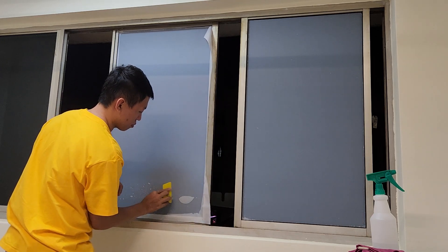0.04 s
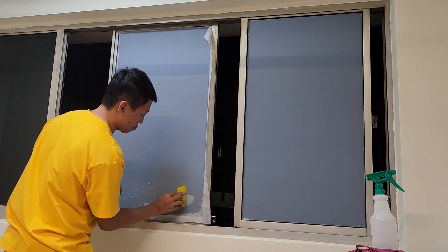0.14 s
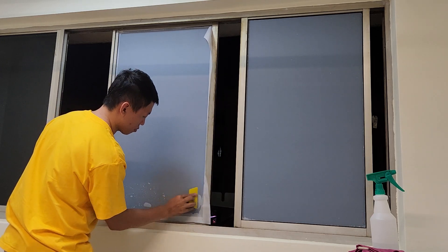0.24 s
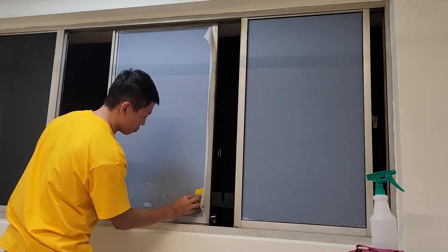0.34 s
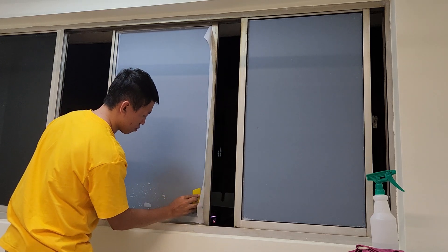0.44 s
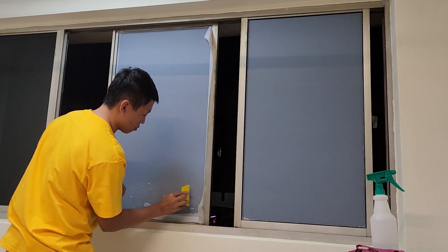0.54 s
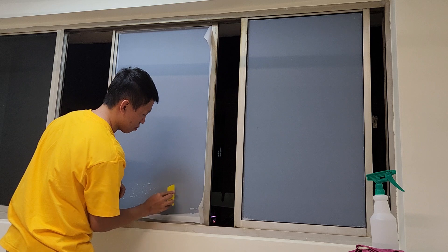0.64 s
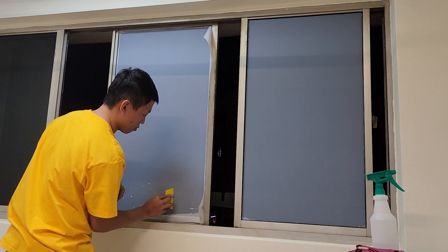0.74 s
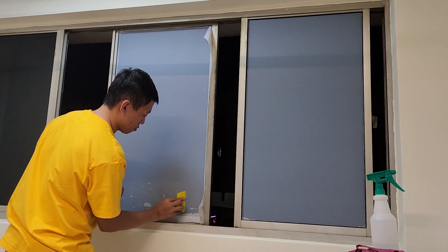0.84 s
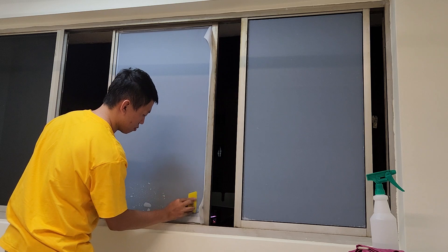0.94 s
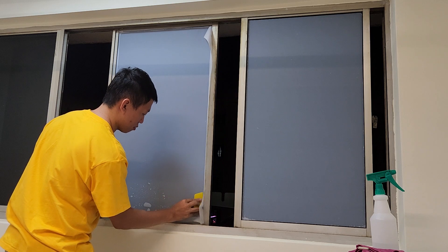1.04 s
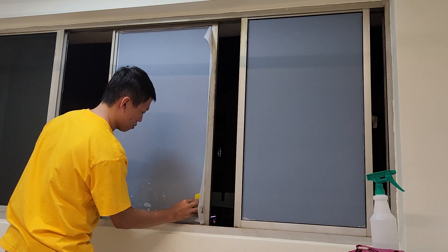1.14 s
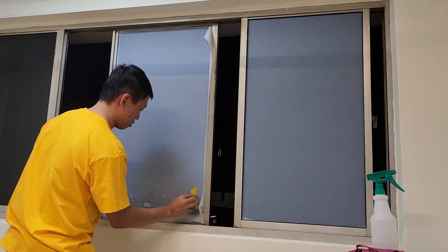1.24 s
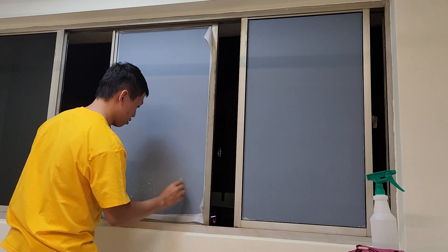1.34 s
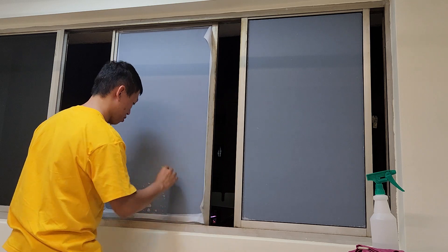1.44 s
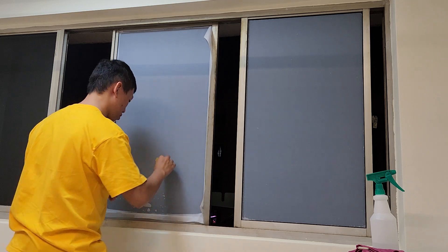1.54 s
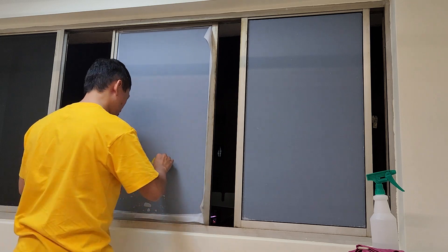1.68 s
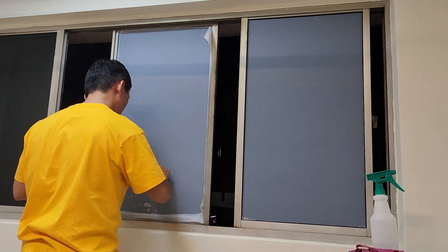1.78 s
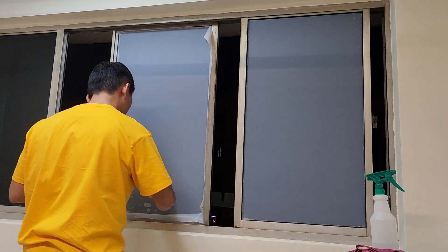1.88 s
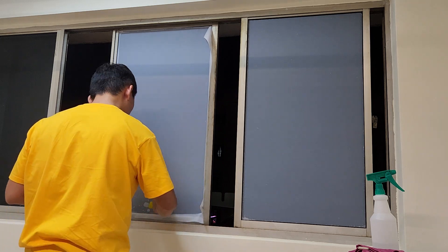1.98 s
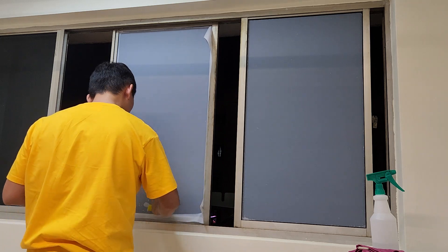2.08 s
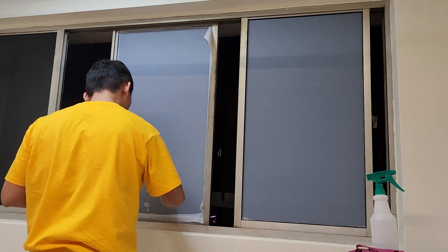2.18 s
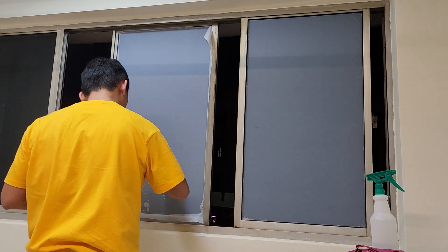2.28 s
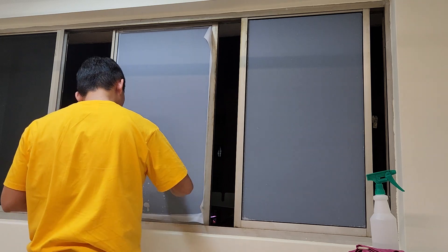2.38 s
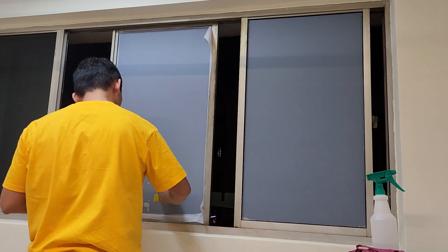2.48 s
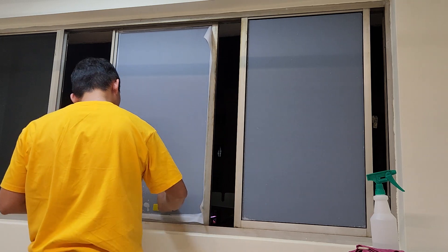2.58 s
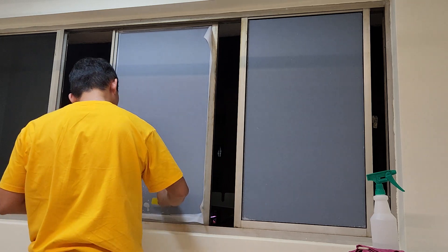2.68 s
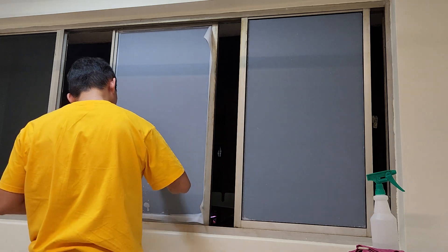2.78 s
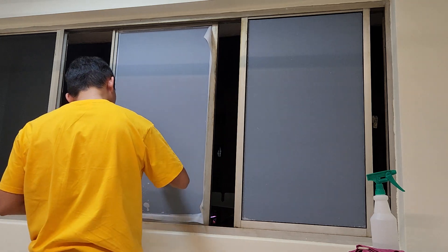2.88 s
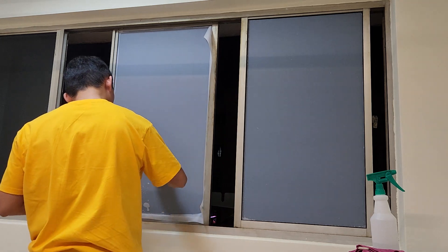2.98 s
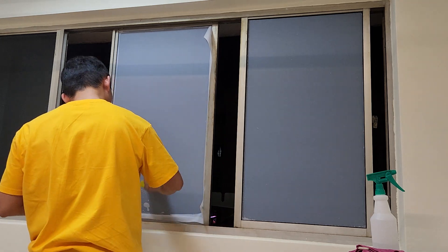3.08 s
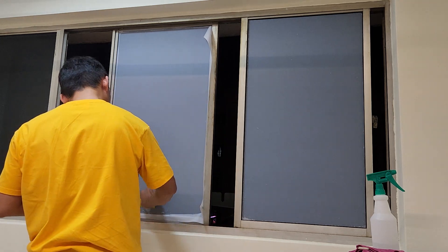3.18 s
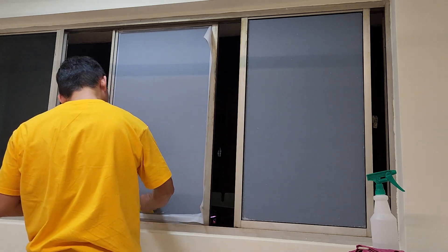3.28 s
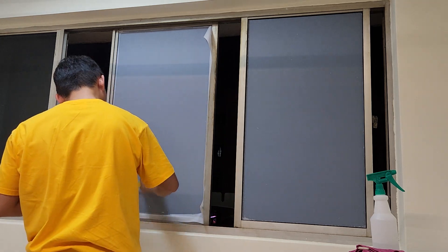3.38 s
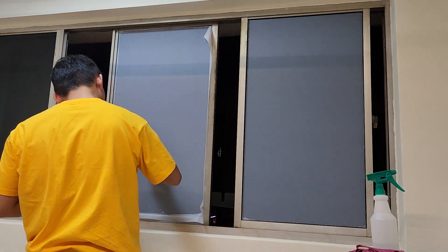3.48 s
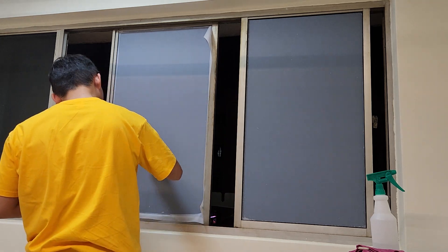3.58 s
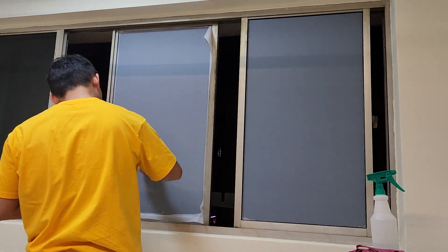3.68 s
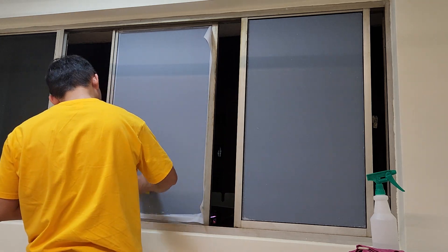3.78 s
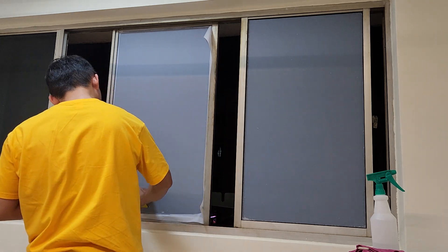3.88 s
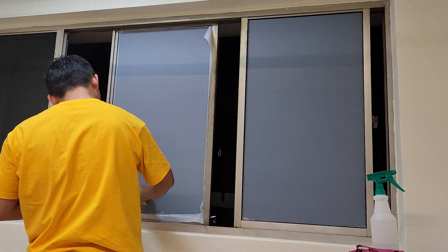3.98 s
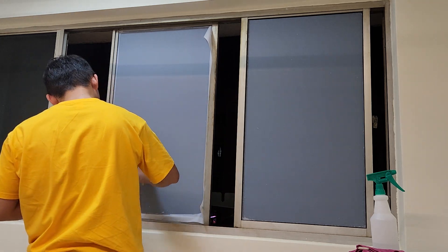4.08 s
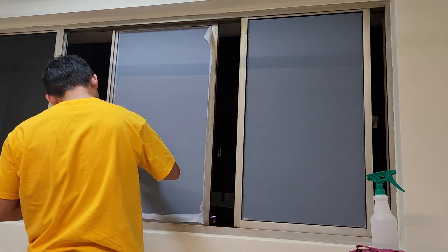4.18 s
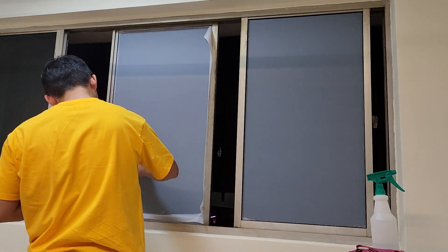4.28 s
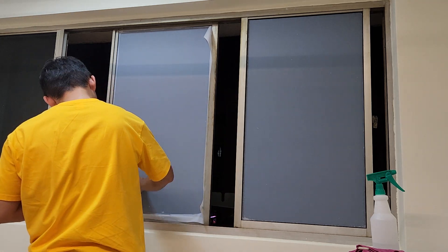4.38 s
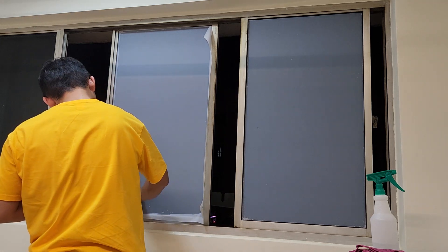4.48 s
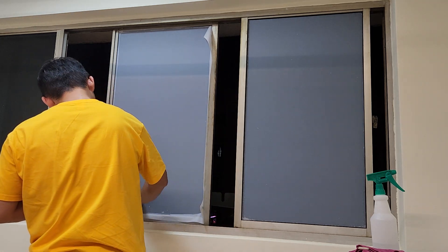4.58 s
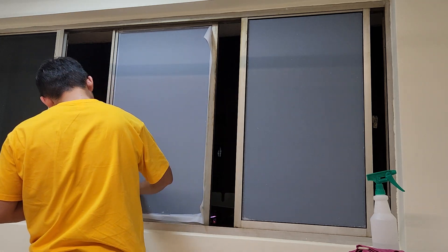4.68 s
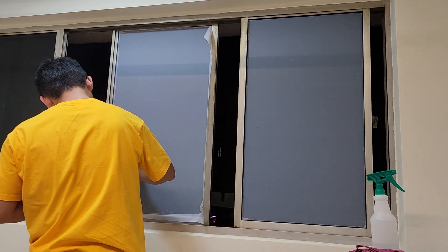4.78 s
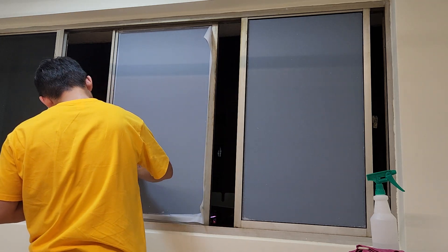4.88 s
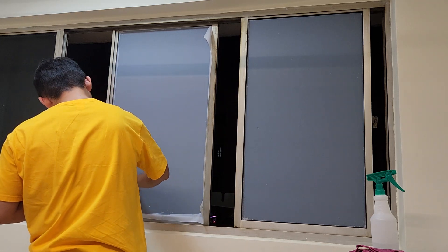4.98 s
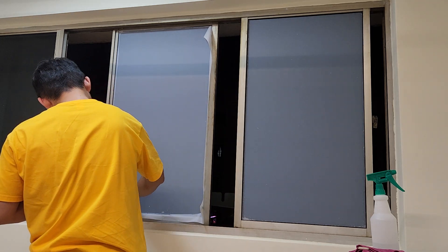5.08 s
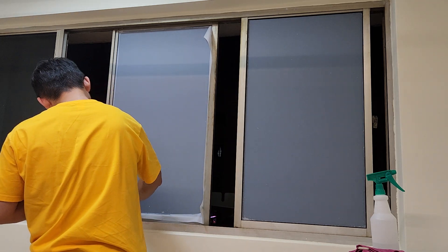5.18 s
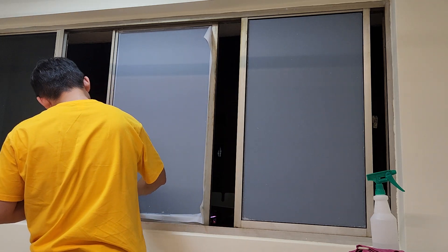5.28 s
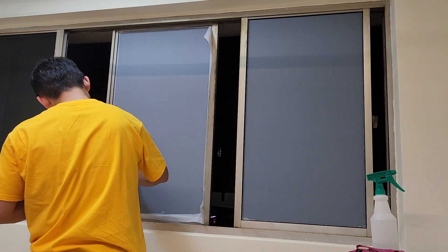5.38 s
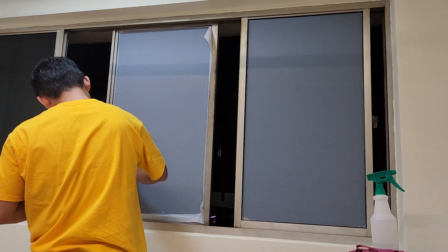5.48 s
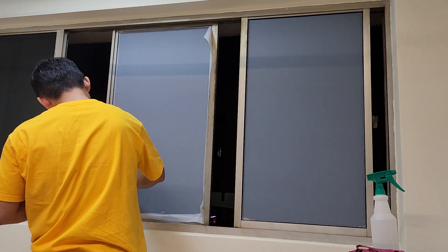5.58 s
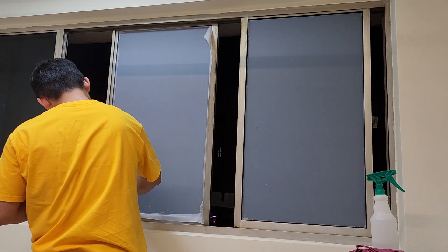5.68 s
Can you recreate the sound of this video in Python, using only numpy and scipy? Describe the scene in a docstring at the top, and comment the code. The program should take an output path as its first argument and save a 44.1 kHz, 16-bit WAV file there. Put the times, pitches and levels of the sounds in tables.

```python
"""Plate swept over wet film on a window

In a bare, quiet room, just left of a phone's stereo pair, a plastic plate rubs wet film on a pane.
Noise and random slips make gritty hiss that swells and fades, first sideways, then downward.
Noise bursts and a decaying sine make ticks and knocks on the glass at some landings.
Gliding sines and noise make the pushed sash creak, with low thuds from the pane.
Random echo tails ring after the work, over a low drone, two wavering hum lines and faint air."""
import sys
import numpy as np
from scipy import signal
from scipy.fft import rfft, irfft, next_fast_len
from scipy.io import wavfile
from scipy.ndimage import map_coordinates

SR = 44100
rng = np.random.default_rng(int(sys.argv[2]) if len(sys.argv) > 2 else 0)


def dump(signal):
    """Clip the signal to [-1, 1] and save it as 16-bit WAV at the path in sys.argv[1]."""
    limited = np.clip(np.atleast_2d(signal).T, -1, 1)
    pcm = np.round(limited * 32767).astype(np.int16)
    wavfile.write(sys.argv[1], SR, pcm)


N = 252693

# Levels of sources are set before the room's gains; spectra give shape only.
# The room's low drone: pitch_hz, density_db (per Hz)
DRONE_SPECTRUM = [(12, -10), (24, -3.5), (31, -11), (41, 1), (52, -2), (65, 0), (100, -1.5), (125, -2),
                  (165, -6), (200, -10.5), (260, -14.5), (360, -12.5), (470, -28.5), (900, -79)]
# Faint air noise: pitch_hz, density_db (per Hz)
AIR_SPECTRUM = [(200, 0.5), (400, 4.5), (700, 6), (1200, -4), (2000, -2), (4000, -13.5), (8000, -24.5),
                (10200, -19.5), (11300, -47), (15500, -44)]
# Hum lines: pitch_hz, level_db (about which each wavers)
HUM_LINES = [(84, -58), (151, -60.5)]
# Echo decay, before the early boost: pitch_hz, t60_s
ROOM_DECAY = [(100, 0.17), (600, 1), (2000, 0.84), (5000, 0.73), (8000, 0.66), (13000, 0.51)]
# Passes of the plate, pressed hard or just grazing on the way back: start_s, sideways (1, downward 0),
# speed_up_s, slow_down_s, top_speed_level_db, touch_down_level_db, first_bite_db, body_db, ring_hz,
# fizz_db, treble_at_first_touch_db
PASSES = [(0, 1, .01, .07, -64, -61, -62, -2, 2700, -3, 0),
          (.092, 1, 0.22, 0.15, -30.5, -62.5, -39, -.5, 2820, 3.5, -4),
          (.585, 1, 0.015, 0.041, -44, -54, -63, 8.5, 2550, 3, 0.5),
          (.884, 1, 0.13, 0.14, -32, -35, -36.5, 0, 2540, 2.5, -13.5),
          (1.335, 1, .025, 0.023, -46, -61, -64, 3, 2500, 3.5, 1),
          (1.511, 1, 0.068, 0.08, -55.5, -53, -62, -20, 2520, 13.5, -4),
          (1.735, 0, 0.061, 0.035, -50.5, -59, -70, -6, 2000, 5, -9),
          (1.815, 0, .033, .05, -38.5, -47, -52, -18, 2020, 2, 5),
          (1.87, 0, 0.087, 0.11, -29, -40, -53, -1.5, 2500, 3.5, -12),
          (2.11, 0, 0.055, 0.059, -44.5, -52, -65, -2, 2500, 6, 4),
          (2.481, 0, 0.13, 0.11, -32, -38, -50, -0.5, 2160, 3.5, -10),
          (3.076, 0, 0.16, 0.13, -28, -40, -35, -1.5, 2270, 2.5, -10.5),
          (3.688, 0, 0.2, 0.15, -29, -57.5, -35, -.5, 2700, 4, 3),
          (4.381, 0, 0.1, 0.17, -30.5, -35, -44, -.5, 2450, 3, -5.5),
          (5.006, 0, 0.13, 0.15, -32, -55.5, -33, 2, 2570, 4, -12),
          (5.555, 0, 0.2, .13, -35, -75, -39.5, 3.5, 2290, 1.5, 11.5)]
# Colour of sideways rubbing: pitch_hz, density_db (per Hz)
SIDEWAYS_SPECTRUM = [(200, -26), (500, -26), (850, -18), (1150, -16.5), (1450, -7.5), (1700, -7.5),
                     (2200, -3.5), (2800, -2.5), (3600, -4.5), (4700, -5), (6000, -9), (7500, -11.5),
                     (9500, -18), (15500, -22)]
# Colour of downward rubbing: pitch_hz, density_db (per Hz)
DOWNWARD_SPECTRUM = [(200, -45), (500, -33), (800, -19), (1100, -10.5), (1500, -3.5), (1900, -1),
                     (2450, -0.5), (3000, -6.5), (3800, -12.5), (4800, -10), (7000, -15.5), (9500, -20.5),
                     (12500, -23.5), (15500, -25.5)]
# Landings of the plate on the glass: start_s, knock_db, knock_decay_s, tick_db, pane_ring_db
LANDINGS = [(0.104, -44.5, 0.02, -40, -60), (1.818, -50, 0.013, -62, -52), (1.84, -43, 0.014, -51, -44),
            (2.492, -45, 0.0098, -54, -62), (3.078, -45, 0.013, -50, -64), (3.69, -42.5, 0.017, -36, -70),
            (5.008, -44, 0.03, -52, -71), (5.553, -46, 0.016, -51, -66)]
# Dull knock of the glass: pitch_hz, density_db (per Hz)
KNOCK_SPECTRUM = [(100, -20), (300, -13), (490, -2), (750, -3), (1200, -2), (3000, -20), (10000, -47)]
# Tick of the plate's edge: pitch_hz, density_db (per Hz)
TICK_SPECTRUM = [(500, -14), (1800, 23), (5000, -7), (12000, -7), (15500, -29)]
# Creaks of the sash: start_s, length_s, level_db
SASH_CREAKS = [(0.589, .075, -41), (.706, .06, -38), (0.816, .02, -42.5), (0.859, .04, -43),
               (1.333, 0.023, -42), (1.373, 0.056, -41), (1.452, .02, -40), (1.481, 0.04, -40),
               (1.622, 0.017, -41.5), (2.771, 0.027, -43), (2.796, 0.057, -40.5), (2.846, .045, -42),
               (3.321, .022, -38), (3.387, 0.022, -37), (3.417, 0.051, -38), (4.201, 0.023, -37.5)]
# Rattle of the sash frame: pitch_hz, density_db (per Hz)
FRAME_SPECTRUM = [(300, -21), (600, -14.5), (900, -4.5), (1050, -5), (1280, 0), (1500, -4), (1900, -19.5),
                  (4000, -65)]

SWELL_POWER, FADE_POWER = 2.29, 1.57  # how the level bends into and out of top speed
FADE_DB = 11  # level lost after one slow-down time
BITE_S = 0.012  # the edge's first bite dies away
CONTACT_S = 0.0034  # the edge settles on the film
STROKE_S = 0.79  # time allowed for each pass
RING_DB = 2.2  # the plate's resonance
PANE_HZ, PANE_DECAY_S = 514, 0.0094  # the damped pane's main mode
CREAK_HZ = 1196  # pitch about which a creak wavers once settled
SLIP_S, DRAG_DB = 0.018, -7  # a creak breaks loose at full strength, then drags on more weakly
STUTTER_DB, STUTTER_PER_S = 3, 111  # unevenness of the drag
TOP_HZ = 15820  # the phone's band limit


def amp(db):
    """Decibels to gain."""
    return 10 ** (np.asarray(db) / 20)


def unit(x):
    """Scale to rms 1."""
    return x / np.sqrt(np.mean(x ** 2) + 1e-20)


def along(points, hz):
    """Read a curve of (Hz, value) points on a log frequency axis."""
    f, v = np.transpose(points)
    return np.interp(np.log(hz + 1), np.log(f + 1), v)


def wobble(rate, size):
    """A smooth random curve with rate knots a second."""
    knots = rng.standard_normal(int(size * rate / SR) + 4)
    return map_coordinates(knots, [np.arange(size) * rate / SR])


def filtered(x, response):
    """Multiply the spectrum of x by a response of frequency."""
    size = x.shape[-1]
    m = next_fast_len(size + 8192)  # padding keeps the wrap-around clear
    spectrum = rfft(x, m) * response(np.fft.rfftfreq(m, 1 / SR))
    return irfft(spectrum, m)[..., :size]


def coloured(x, spectrum):
    """Shape x by a spectrum and scale it to rms 1."""
    return unit(filtered(x, lambda hz: amp(along(spectrum, hz))))


def add(track, s, sound):
    """Mix a sound into a track at time s."""
    start = max(round(s * SR), 0)
    part = sound[..., :N - start]
    track[..., start:start + part.shape[-1]] += part


def reverb(size):
    """A new diffuse stereo tail, the left of energy 1; the deep bass and the treble die soonest."""
    hop = 128
    t = np.arange(size // hop + 1) * hop / SR
    hz = np.fft.rfftfreq(2 * hop, 1 / SR)
    re, im = rng.standard_normal((2, 2, len(hz), len(t)))
    decay = amp(-60 * t / along(ROOM_DECAY, hz)[:, None])
    tail = signal.istft((re + 1j * im) * decay, nperseg=2 * hop)[1]
    t = np.arange(tail.shape[1]) / SR
    onset = 1 - np.exp(-t / 0.0016)
    tail *= onset * (1 + 1.44 * np.exp(-t / 0.021))  # sill and near walls answer first
    return tail / np.linalg.norm(tail[0])


def in_room(x, direct_db, wet_db, lead=3):
    """Direct sound, reaching the left lead samples earlier, and the room's answer."""
    response = amp(wet_db) * reverb(size=SR // 2)
    response[[0, 1], [0, round(lead)]] += amp(direct_db)
    return signal.fftconvolve(x[None], response, axes=1)


def moving_in_room(x, direct_db, wet_db, size=2400):
    """A moving source meets a different pattern of echoes at each place: a new one every size samples."""
    out = np.zeros((2, N))
    for a in range(0, N, size):
        add(out, a / SR, in_room(x[a:a + size], direct_db, wet_db))
    return out


def background(rumble_db=-47.0, air_db=-57):
    """Shaped noise makes a drone, nearly alike in both ears, and faint air; two sines make wavering hum."""
    mid, side = rng.standard_normal((2, N))
    side_gain = [(60, -36), (170, -18), (350, -14), (700, -19)]  # (Hz, dB)
    side = filtered(side, lambda hz: amp(along(side_gain, hz)))
    drone = coloured(np.array([mid + side, mid - side]), DRONE_SPECTRUM)
    shared_noise = 0.71 * rng.standard_normal(N)
    air = coloured(rng.standard_normal((2, N)) + shared_noise, AIR_SPECTRUM)
    t = np.arange(N) / SR
    hum = np.zeros(N)
    for hz, db in HUM_LINES:
        line = unit(np.sin(2 * np.pi * hz * t + 1.52 * wobble(9, N)))
        hum += amp(db + 3.1 * wobble(5.5, N)) * line
    return amp(rumble_db) * drone + amp(air_db) * air + hum


def grit(size, rate, spread_db, smooth):
    """Tiny slips and bursting air pockets of unequal size, rate a second, over a smooth hiss."""
    slips = (rng.random(size) < rate / SR) * rng.choice([-1, 1], size)
    sizes = amp(spread_db * np.minimum(rng.standard_normal(size), 1.5))  # the largest are capped
    return unit(unit(slips * sizes) + smooth * rng.standard_normal(size))


def effort(t, speed_up, slow_down, top_db, touch_down_db):
    """Level of the rubbing in dB: the arm accelerates to top speed, then slows and lifts."""
    swell = np.maximum(1 - t / speed_up, 0) ** SWELL_POWER
    fade = (np.maximum(t - speed_up, 0) / slow_down) ** FADE_POWER
    return top_db + (touch_down_db - top_db) * swell - FADE_DB * fade


def strokes(fast_db=-30, brighten=0.15, fizz_rise=0.15, run_up_s=0.047, ring_width=0.089,
            direct_db=-8.5, wet_db=0.0):
    """The plate's edge scrapes the film; the faster it goes, the more treble it throws off."""
    dry = np.zeros(N)
    t = np.arange(int(STROKE_S * SR)) / SR
    for (s, sideways, speed_up, slow_down, top_db, touch_down_db, bite_db,
         body_db, ring_hz, fizz_db, touch_db) in PASSES:
        chatter = amp(1.85 * wobble(190.4, len(t)))  # the edge drags unevenly
        rubbing = chatter * grit(len(t), rate=1400, spread_db=5.0, smooth=0.48)
        scrape = coloured(rubbing, SIDEWAYS_SPECTRUM if sideways else DOWNWARD_SPECTRUM)
        # the plate's angle tilts the colour, the grip sets its resonance
        angle = [(1200, body_db), (5000, 0.011), (12000, fizz_db)]
        ring = lambda hz: RING_DB / (1 + ((hz / ring_hz - 1) / ring_width) ** 2)
        scrape = filtered(scrape, lambda hz: amp(along(angle, hz) + ring(hz)))
        # three bands, parting near 4000 and 9500 Hz
        rasp = filtered(scrape, lambda hz: 1 / (1 + (hz / 4000) ** 4))
        hiss = filtered(scrape - rasp, lambda hz: 1 / (1 + (hz / 9500) ** 8))
        fizz = scrape - rasp - hiss
        bite = amp(bite_db) * np.exp(-t / BITE_S)
        force = amp(effort(t, speed_up, slow_down, top_db, touch_down_db)) + bite
        speed = force / amp(fast_db)  # force stands in for speed
        landing = np.exp(-(t / run_up_s) ** 2)  # first touch is duller or brighter
        treble = (hiss + fizz * speed ** fizz_rise) * speed ** brighten
        treble *= amp(touch_db * landing)
        contact = 1 - np.exp(-t / CONTACT_S)
        add(dry, s, force * contact * (rasp + treble))
    return moving_in_room(dry, direct_db, wet_db)


def knocks(tick_decay_s=0.0037):
    """The plate's edge ticks on the glass and the damped pane answers with a dull knock."""
    out = np.zeros((2, N))
    t = np.arange(SR // 10) / SR
    for s, knock_db, decay, tick_db, ring_db in LANDINGS:
        knock = coloured(rng.standard_normal(len(t)), KNOCK_SPECTRUM)
        knock *= amp(knock_db) * np.exp(-t / decay)
        tick = coloured(rng.standard_normal(len(t)), TICK_SPECTRUM)
        tick *= amp(tick_db) * np.exp(-t / tick_decay_s)
        ring = unit(np.sin(2 * np.pi * PANE_HZ * t))
        ring *= amp(ring_db) * np.exp(-t / PANE_DECAY_S)
        add(out, s, in_room(knock + tick + ring, direct_db=-1.5, wet_db=2.5))
    return out


def creaks(waver=0.025, droop=0.043, rough=0.59, thud_db=-3, thud_hz=88):
    """The sash breaks loose in its track with a short squeal and stutters on; each creak shakes the pane."""
    out = np.zeros((2, N))
    t = np.arange(SR // 5) / SR
    for s, length, db in SASH_CREAKS:
        dragging = 1 - np.exp(-(t / SLIP_S) ** 4)
        slip = (1 - np.exp(-t / 0.0013)) * np.exp(-np.maximum(t - length, 0) / .003)
        slip *= amp(dragging * (DRAG_DB + STUTTER_DB * wobble(STUTTER_PER_S, len(t))))
        # starts sharp, then settles
        pitch = CREAK_HZ * (1 + droop * np.exp(-t / 0.0053) + waver * wobble(420, len(t)))
        squeal = unit(np.sin(2 * np.pi * np.cumsum(pitch) / SR))
        squeal *= amp(0.94 * wobble(217, len(t))) * slip
        rattle = coloured(rng.standard_normal(len(t)), FRAME_SPECTRUM)
        rattle *= (1 - np.exp(-t / 0.003)) * np.exp(-t / 0.049)  # the frame rings on
        this_thud_hz = thud_hz * np.exp(0.17 * rng.normal())
        thud = np.sin(2 * np.pi * this_thud_hz * t)
        thud *= (1 - np.exp(-t / 0.0022)) * np.exp(-t / 0.037)
        creak = in_room(squeal + rough * rattle, direct_db=-3.5, wet_db=-6.0, lead=4)
        add(out, s, amp(db) * creak)
        add(out, s, amp(db + thud_db) * thud)  # no echo, alike on both sides
    return out


def scene(left_db=0.85, room_left_db=0.43):
    """The work at the window lies a little to the left, and the room tone leans left too."""
    room_tone = background() * amp([[room_left_db], [-room_left_db]])
    work = strokes() + knocks() + creaks()
    return work * amp([[left_db], [-left_db]]) + room_tone


def record(dry):
    """The phone keeps nothing above its band limit."""
    return filtered(dry, lambda hz: hz < TOP_HZ)


dry = scene()
out = record(dry)
dump(out)
```